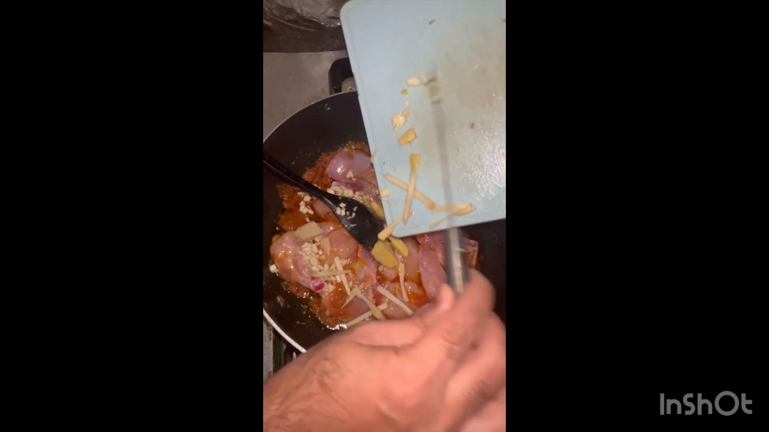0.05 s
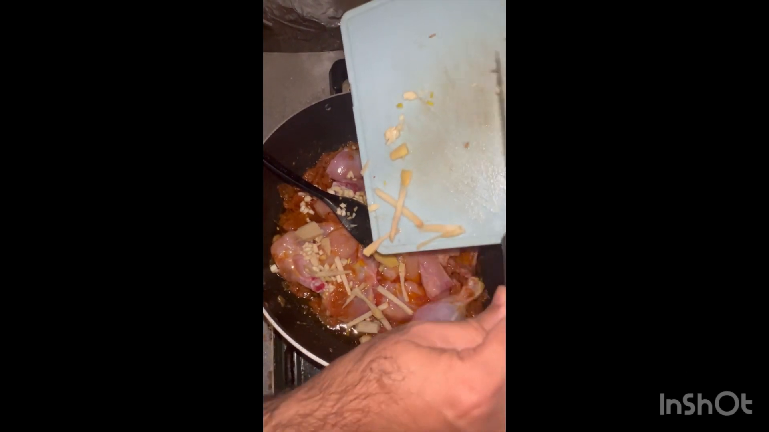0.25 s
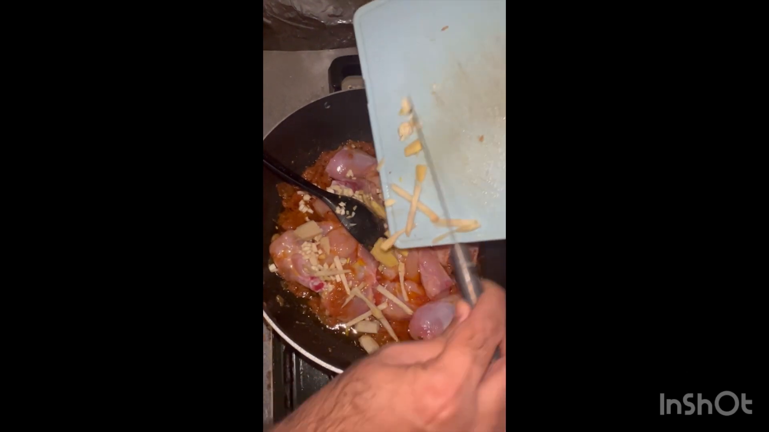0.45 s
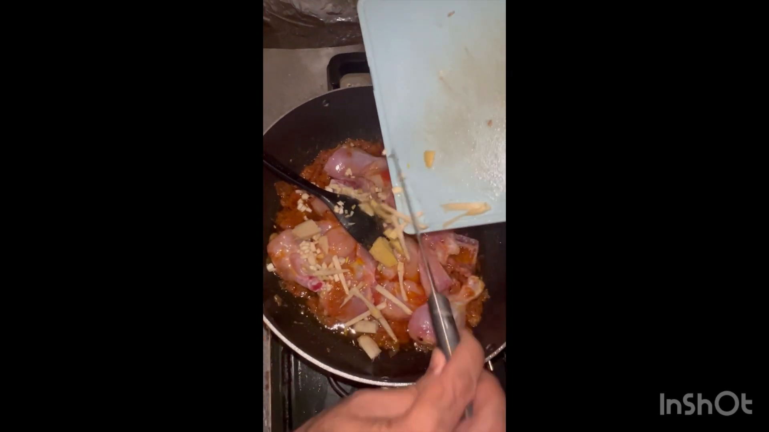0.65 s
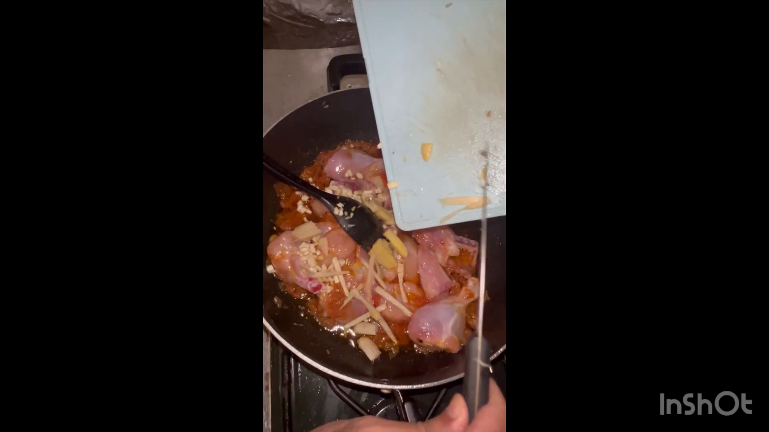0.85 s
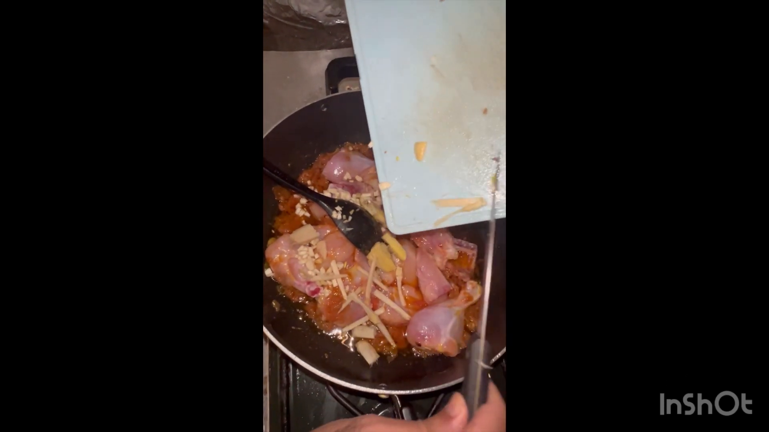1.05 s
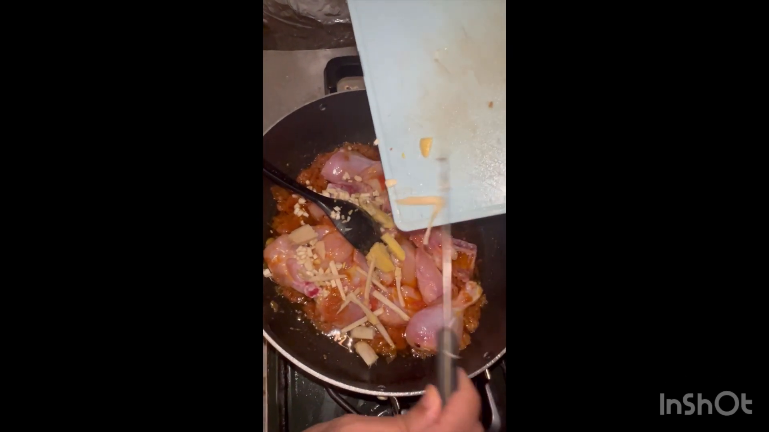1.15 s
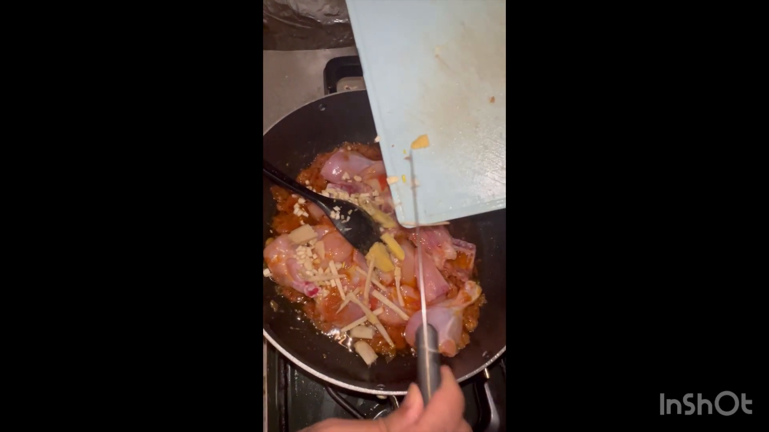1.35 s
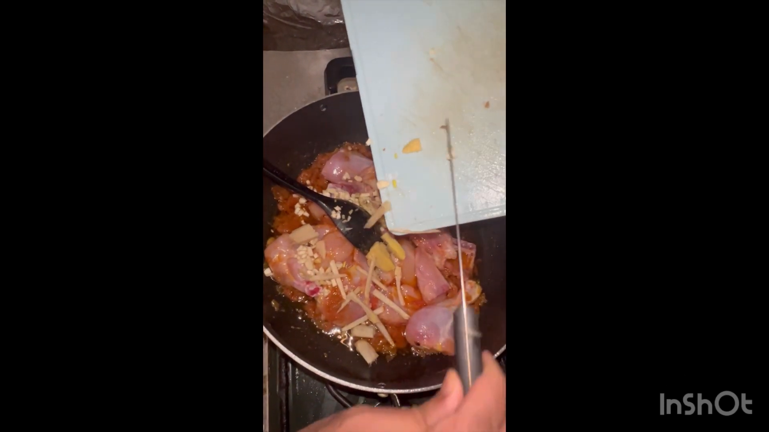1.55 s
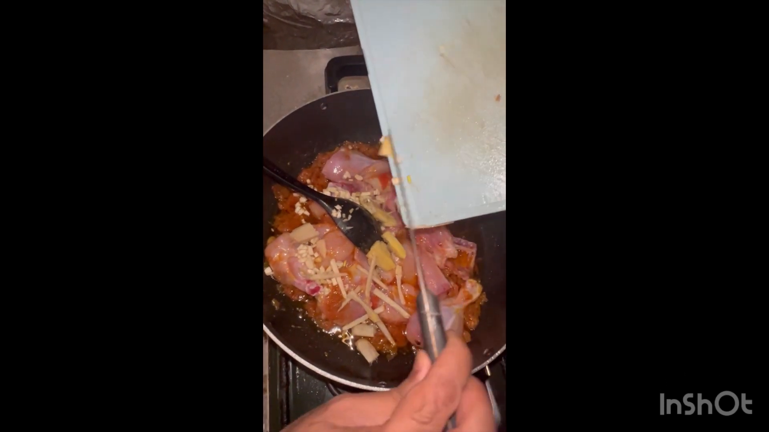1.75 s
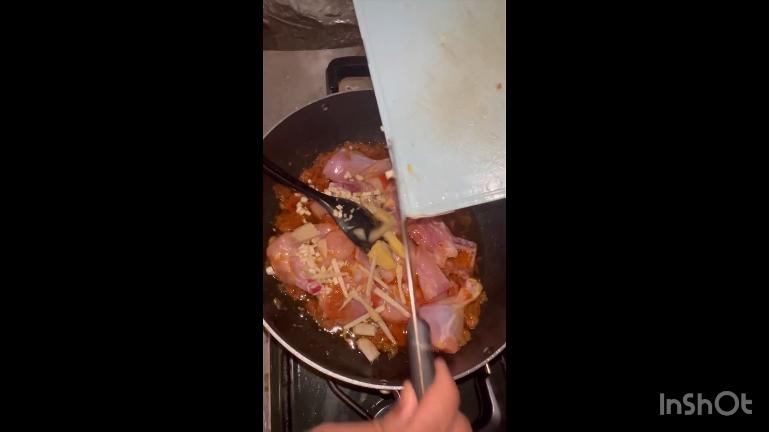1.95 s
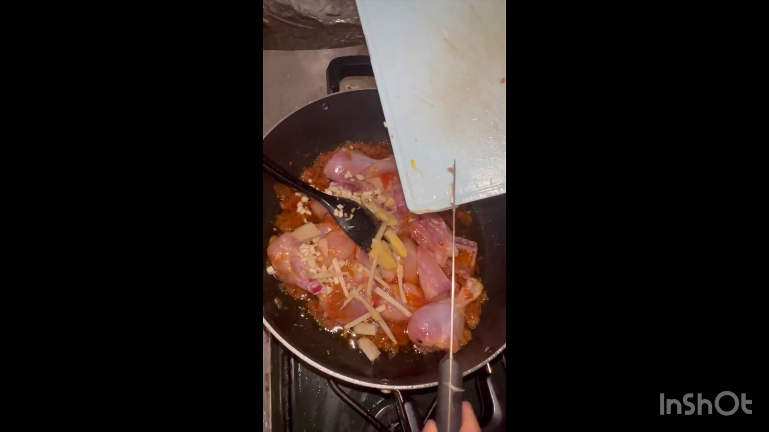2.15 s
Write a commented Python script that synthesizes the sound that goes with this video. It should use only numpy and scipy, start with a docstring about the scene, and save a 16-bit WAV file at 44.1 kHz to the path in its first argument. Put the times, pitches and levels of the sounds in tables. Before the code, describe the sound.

Three short knife scrapes on a plastic cutting board, each starting with a hollow knock.

```python
"""Scraping a cutting board

A knife pushes chopped food off a plastic board held over a pan, in a small kitchen. Three times
the blade knocks down and scrapes along; the last stroke snaps off the edge. Impact and stick-slip
friction excite the same resonances of the board, over mains hum and faint room noise."""
import sys
import numpy as np
from scipy import signal
from scipy.fft import rfft, irfft
from scipy.io import wavfile
from scipy.ndimage import map_coordinates

SR = 44100
rng = np.random.default_rng(int(sys.argv[2]) if len(sys.argv) > 2 else 0)


def output_pcm(signal):
    """Save a mono or channel-first signal as 16-bit PCM at the path in sys.argv[1].

    Samples are clipped to [-1, 1] before scaling.
    """
    pcm = np.clip(np.atleast_2d(signal).T, -1, 1) * 32767
    wavfile.write(sys.argv[1], SR, np.round(pcm).astype(np.int16))


N = 97020
T = np.arange(N) / SR
BIN_HZ = np.arange(N // 2 + 1) * SR / N
ANTIPHASE = np.array([[1], [-1]])   # opposite signs left and right
# Edges in Hz of the board's five ranges, from low to high: flex, body, rasp, grit, hiss.
RANGE_EDGES_HZ = [225, 470, 1100, 2750, 6400, 12200]


def amp(db):
    """Amplitude grows tenfold every 20 dB."""
    return 10 ** (np.asarray(db) / 20)

def unit_rms(x):
    """Normalisation to a mean power of 1."""
    return x / np.sqrt(np.mean(x ** 2) + 1e-20)

def unit_energy(x):
    """Normalisation of each response to an energy of 1."""
    return x / np.sqrt(np.sum(x ** 2, axis=-1, keepdims=True) + 1e-20)

def at_hz(rows, hz):
    """Interpolation of a table's columns on a logarithmic frequency axis."""
    row_hz, *columns = np.transpose(rows)
    return [np.interp(np.log(hz + 1e-9), np.log(row_hz), column) for column in columns]

def band(x, low, high, order=2):
    """Butterworth band-pass between two frequencies in Hz."""
    sections = signal.butter(order, [low, min(high, .45 * SR)], "band", fs=SR, output="sos")
    return signal.sosfilt(sections, x)

def resonate(x, hz, width):
    """A damped resonator with unit gain at its peak: the narrower it is, the longer it rings."""
    radius = np.exp(-np.pi * width / SR)
    feedback = [1, -2 * radius * np.cos(2 * np.pi * hz / SR), radius ** 2]
    return signal.lfilter(np.array([1, 0, -1]) * (1 - radius ** 2) / 2, feedback, x + 1e-18)

def modal_ring(modes):
    """Modal superposition: an impulse response is a sum of damped resonances."""
    click = signal.unit_impulse(SR // 10)
    return sum(amp(db) * resonate(click, hz, width) for hz, width, db in modes)

def drift(hz):
    """Random fluctuation of unit rms: noise low-passed at hz."""
    return unit_rms(irfft(rfft(rng.standard_normal(N)) / (1 + (BIN_HZ / hz) ** 2), N))

def burst(decay_s):
    """A spray of tiny clicks merges into exponentially decaying noise."""
    t = T[:SR // 30]
    return rng.standard_normal(len(t)) * np.exp(-t / decay_s)

def excite(drive, response):
    """A linear system convolves its drive with its impulse response."""
    return signal.fftconvolve(drive, response)[:N]

def strike(times, peak_db, response):
    """Impulsive excitation: each blow starts a scaled copy of the response."""
    clicks = np.zeros(N)
    clicks[(np.asarray(times) * SR).astype(int)] = amp(peak_db)
    return excite(clicks, response / np.abs(response).max())


def mains_hum():
    """Steady partials add to a hum that slowly swells and sinks."""
    # Each row: frequency in Hz, rms level in dB before the swell.
    partials = [(49.8, -65), (99.8, -46), (124.8, -66), (149.7, -64.5), (297.5, -70), (425, -68.5),
                (697, -81.5)]
    # Each row: time in seconds, gain in dB.
    swell = [(0, 0), (0.3, 1), (0.75, -1.8), (0.98, -.5), (1.2, 2), (1.42, -0.3), (1.72, -2.5), (2.15, 1)]
    hum = sum(amp(db) * np.sqrt(2) * np.sin(2 * np.pi * (hz * T + rng.random())) for hz, db in partials)
    return hum * amp(np.interp(T, *np.transpose(swell)))

def room_noise():
    """Filtered noise: a narrow rumble and a broad wash, partly coherent between left and right."""
    # Each row: frequency in Hz, relative spectral density in dB.
    spectrum = [(100, -23), (170, -8.5), (298, -11), (367, -14.5), (426, -3.5), (459, -15.5), (631, -10),
                (1440, -24.5), (1550, -29.5), (2100, -22.5), (3110, -38), (5150, -31.5), (15000, -54)]
    rumble = unit_rms(band(rng.standard_normal(N + SR), 42.4, 66.6, order=3)[SR:])
    low_cut = BIN_HZ ** 4 / (BIN_HZ ** 4 + 60 ** 4)
    colour = amp(at_hz(spectrum, BIN_HZ)[0]) * low_cut
    mid, side = unit_rms(irfft(rfft(rng.standard_normal((2, N))) * colour, N))
    return amp(-61.5) * (rumble + mid + amp(-4.5) * side * ANTIPHASE)

def kitchen(x):
    """Reverberation: direct sound, sideways reflections from pan and hob, and a diffuse tail."""
    # Each row: frequency in Hz, reverberation time in seconds, level in dB.
    reverberation = [(202, 0.25, -11), (664, 0.25, -2), (2480, 0.28, -2.5), (5560, 0.24, -0.5),
                     (11300, 0.16, -8)]
    t, edges_hz = T[:SR // 2], np.geomspace(90, 18000, num=9)
    white, tail = rng.standard_normal((2, len(t))), 0
    build_up = 1 - np.exp(-t / 0.0027)
    for low, high in zip(edges_hz, edges_hz[1:]):
        t60, db = at_hz(reverberation, np.sqrt(low * high))
        dying = band(white, low, high) * amp(-60 * t / t60) * build_up
        tail = tail + amp(db) * np.sqrt(2 * (high - low) / SR) * unit_energy(dying)
    early = band(rng.standard_normal(len(t)), 2200, 14000) * np.exp(-t / 0.0064) * (t > .001)
    responses = tail + amp(-8) * unit_energy(early) * ANTIPHASE
    reflected = np.array([excite(x, response) for response in responses])
    left_lag_s = .000019
    left = amp(0.04) * irfft(rfft(x) * np.exp(-2j * np.pi * BIN_HZ * left_lag_s), N)
    return reflected + [left, x]

def board_responses():
    """The board's impulse response, contact click plus modal ring, split into its five ranges."""
    # Modes of board and blade. Each row: frequency in Hz, bandwidth in Hz, relative gain in dB.
    modes = [(260, 115, -9), (346.3, 89, -3.5), (375.5, 28.3, -1.5), (552, 38, -3), (615.4, 64, -0.5),
             (688, 49, 0.5), (767, 36, -14), (863, 27, -9.5), (1323, 124, -14.5), (1485, 79, -13),
             (1774, 240, -10.5), (2185, 96, -8), (2375, 30, -17.5), (2404, 38, -9), (3234, 180, -12.5),
             (3690, 600, -22), (4590, 170, -18.5), (5150, 83, -19.5), (5800, 290, -20), (6830, 80, -19),
             (7870, 500, -17), (9000, 400, -57), (11200, 520, -67)]
    response = modal_ring(modes) + amp(-23) * signal.unit_impulse(SR // 10)
    ranges = zip(RANGE_EDGES_HZ, RANGE_EDGES_HZ[1:])
    return [unit_energy(band(response, low, high, order=3)) for low, high in ranges]

def taps():
    """Light impacts as the board is tilted ring a few midrange modes, which sound hollow."""
    # Each row: time in seconds, peak level in dB.
    touches = [(0.6402, -33), (1.9382, -33), (1.9590, -42.5), (2.0895, -50)]
    # Each row: frequency in Hz, bandwidth in Hz, relative gain in dB.
    modes = [(944, 37, 1.5), (1196, 120, -0.5), (1500, 390, -6.5), (1757, 60, 5)]
    return strike(*np.transpose(touches), band(modal_ring(modes), 895, 1980, order=3))

def stick_slip():
    """Stick-slip friction: the edge catches at random on scored plastic, under uneven pressure."""
    slips_per_s, spread_db, judder_db = 7000, 2.5, 1
    sizes = amp(spread_db * np.minimum(rng.exponential(1, N), 4))
    signs = rng.choice([-1, 1], N)
    catches = rng.random(N) < slips_per_s / SR
    judder = amp(judder_db * drift(hz=69.5))
    return unit_rms(sizes * signs * catches * judder)

def brushes(responses):
    """Grazing friction of the blade excites only the board's upper ranges."""
    # Each row: centre time in seconds, drive level in dB.
    grazes = [(0.013, -62), (0.625, -58), (0.79, -74), (0.865, -73.5), (1.37, -74.5)]
    envelope = sum(amp(db) * np.exp(-((T - centre_s) / .012) ** 2) for centre_s, db in grazes)
    rasp, grit, hiss = responses[2:]
    return excite(stick_slip() * envelope, amp(3.5) * rasp + amp(2) * grit + amp(-15) * hiss)

def blade_clacks():
    """Free vibration of the blade: each landing rings its modes up to a cutoff of its own."""
    # Each row: time in seconds, peak level in dB, upper cutoff in Hz.
    landings = [(0.2156, -24, 5230), (0.9950, -18, 4500), (1.5507, -15.5, 2880)]
    # Each row: frequency in Hz, bandwidth in Hz, relative gain in dB.
    modes = [(1800, 150, -1.5), (2110, 140, 3.5), (2280, 87, -0.5), (2786, 63, -7), (3200, 160, -9.5),
             (3430, 120, -16), (6400, 250, -14)]
    ring = modal_ring(modes)
    return sum(strike([start_s], db, band(ring, 1440, top_hz)) for start_s, db, top_hz in landings)

def blade_snap():
    """Sudden release: the blade slips off the board's edge with a bright transient."""
    return strike(times=[1.7502], peak_db=-22.5, response=band(burst(decay_s=0.0018), 6030, 13800))

def knocks(responses):
    """Impact excitation: the blade lands, bounces and ticks on the board, which sways in the hand."""
    # Each row: time in seconds, then peak levels in dB of flex, body, rasp, grit and hiss.
    contacts = [(0.2154, -23, -11.5, -18, -24.5, -39), (0.2315, -30, -18.5, -20.5, -34.5, -50),
                (0.2406, -26.5, -47, -39, -45, -62), (0.5520, -28.5, -30.5, -45, -31, -46),
                (0.9950, -27, -20.5, -20, -29.5, -39.5), (1.0031, -36, -28.5, -26, -38.5, -53),
                (1.5505, -25.5, -13, -18.5, -29, -54), (1.5535, -39, -21.5, -18.5, -32, -66),
                (1.5661, -33, -22.5, -30, -41, -65), (1.5734, -33, -23, -28.5, -47, -57),
                (1.7500, -30, -30.5, -23, -25, -21), (1.9316, -61, -70, -51, -51, -54.5),
                (1.9595, -70, -55, -54, -51.5, -61)]
    # Each row: time of landing in seconds, peak level in dB.
    sways = [(0.217, -35), (0.999, -38), (1.552, -40)]
    times, *levels = np.transpose(contacts)
    flex, body, rasp, grit, hiss = responses
    crunch = burst(decay_s=0.0024)   # a contact crushes the surface for a moment
    struck = [flex, body, rasp, np.convolve(grit, crunch), np.convolve(hiss, crunch)]
    impacts = sum(strike(times, db, response) for db, response in zip(levels, struck))
    sway = resonate(signal.unit_impulse(SR // 2), hz=127.4, width=18.3)
    return impacts + strike(*np.transpose(sways), sway)

def stroke_envelopes():
    """Amplitude envelopes of the friction in the five ranges, zero between strokes."""
    # One list a stroke. Each row: time in seconds, then drive in dB of flex, body, rasp, grit and hiss.
    strokes = [
        [(0.24, -34, -35.5, -47.5, -53, -63), (0.272, -32.5, -30, -37, -43.5, -54),
         (0.322, -39, -26, -33.5, -45, -49.5), (0.37, -35, -21, -34.5, -35, -46.5),
         (0.408, -47.5, -27, -31, -37, -44.5), (0.458, -35, -30, -34, -42, -49.5),
         (0.496, -36, -34, -36.5, -38.5, -40.5), (0.518, -43, -45.5, -38.5, -39, -39.5),
         (0.556, -41, -33, -42.5, -49.5, -56), (0.578, -54, -95, -65, -63, -63),
         (0.62, -61, -49, -48.5, -63, -77)],
        [(1.02, -37.5, -50, -44, -59, -64), (1.042, -41, -47.5, -50.5, -59, -68),
         (1.062, -47, -37, -44, -48, -59), (1.092, -49, -31.5, -33.5, -41, -46.5),
         (1.122, -52.5, -36.5, -33.5, -38, -42.5), (1.236, -40, -39, -42.5, -51, -62.5),
         (1.25, -49.5, -43.5, -42, -57, -69), (1.264, -47, -43.5, -60, -79, -75),
         (1.288, -65, -78, -65, -82, -89), (1.308, -60, -48.5, -53.5, -66.5, -82),
         (1.33, -71, -98, -74, -73, -83)],
        [(1.582, -41, -38, -44.5, -56, -69), (1.646, -38, -36, -41.5, -51, -57.5),
         (1.698, -36.5, -36.5, -39, -47.5, -53.5), (1.728, -49, -43, -40, -47.5, -51),
         (1.742, -39, -47.5, -52, -44.5, -76), (1.752, -34, -32.5, -34, -44, -40),
         (1.768, -47, -90, -67, -59, -59), (1.784, -53, -67, -59, -57, -57), (1.806, -46, -57, -64, -74, -64),
         (1.82, -43.5, -49, -45.5, -47.5, -48), (1.85, -68, -94, -70, -69, -87)],
    ]
    envelopes = np.zeros((5, N))
    for times, *levels in map(np.transpose, strokes):
        envelopes += amp([np.interp(T, times, db, left=-np.inf, right=-np.inf) for db in levels])
    return envelopes

def edge_echo(x):
    """Reflection from the board's edge, with a delay that wanders as the blade travels."""
    delay_s = .003 + .00006 * drift(hz=2.94)
    return map_coordinates(x, [(T - delay_s) * SR], order=3)

def rub_rings(rasp_envelope, grit_envelope):
    """Rubbing excites narrow resonances, each swelling and fading as the contact moves."""
    # Each row: frequency in Hz, bandwidth in Hz, level in dB relative to its range's envelope.
    modes = [(1364, 31, -20.5), (1480, 18, -15), (1547, 17, -17), (1797, 28, -11.5), (2448, 21, -14.5),
             (3247, 88, -7.5), (4410, 17, -12.5), (4430, 54, -24)]
    drive, rings, swell_db = stick_slip(), 0, 1.5
    for hz, width, db in modes:
        swell = amp(db + swell_db * np.clip(drift(hz=8.1), -2, 1))
        envelope = rasp_envelope if hz < RANGE_EDGES_HZ[3] else grit_envelope
        rings = rings + unit_rms(resonate(drive, hz, width)) * swell * envelope
    return rings

def gliding_resonance():
    """Narrow-band noise follows the board's main resonance, which the blade's position shifts."""
    # Each row: time in seconds, frequency in Hz.
    pitch = [(0.24, 630), (0.31, 595), (0.37, 689), (0.41, 600.5), (0.54, 740), (1.08, 738.6),
             (1.125, 681.5), (1.17, 601.6), (1.21, 677.5), (1.25, 633), (1.60, 651.2), (1.73, 720)]
    phase = 2 * np.pi * np.cumsum(np.interp(T, *np.transpose(pitch))) / SR
    chatter = drift(hz=26) + 1j * drift(hz=26)   # random amplitude and phase
    limited = chatter / np.sqrt(0.27 + np.abs(chatter) ** 2)
    return unit_rms(band(np.real(limited * np.exp(1j * phase)), 510, 920))

def scrapes(responses):
    """Forced vibration: friction drives the board, and the upper ranges interfere with their echo."""
    drive, envelopes = stick_slip(), stroke_envelopes()
    flex, body, rasp, grit, hiss = map(excite, drive * envelopes, responses)
    body_envelope, rasp_envelope, grit_envelope = envelopes[1:4]
    glide = body_envelope * gliding_resonance()
    upper = amp(-0.5) * rasp + grit + hiss
    echo_gain = amp(-5)
    combed = (upper + echo_gain * edge_echo(upper)) / np.hypot(1, echo_gain)
    rings = rub_rings(rasp_envelope, grit_envelope)
    return amp(-2.5) * flex + amp(-1.5) * body + amp(-3.5) * glide + combed + rings


def scene():
    """Superposition of friction and impacts in the kitchen, over its hum and noise."""
    responses = board_responses()
    friction = amp(-0.07) * scrapes(responses) + brushes(responses)
    # The treble of the friction reaches left and right unequally.
    sideways = amp(-15) * band(edge_echo(friction), 2100, 14000) * ANTIPHASE
    impacts = knocks(responses) + blade_clacks() + blade_snap() + taps()
    return kitchen(friction + impacts) + sideways + mains_hum() + room_noise()

def record(dry):
    """A steep low-pass filter removes the highest treble."""
    return signal.sosfilt(signal.cheby2(14, 60, 16500, fs=SR, output="sos"), dry)


dry = scene()
out = record(dry)
output_pcm(out)
```